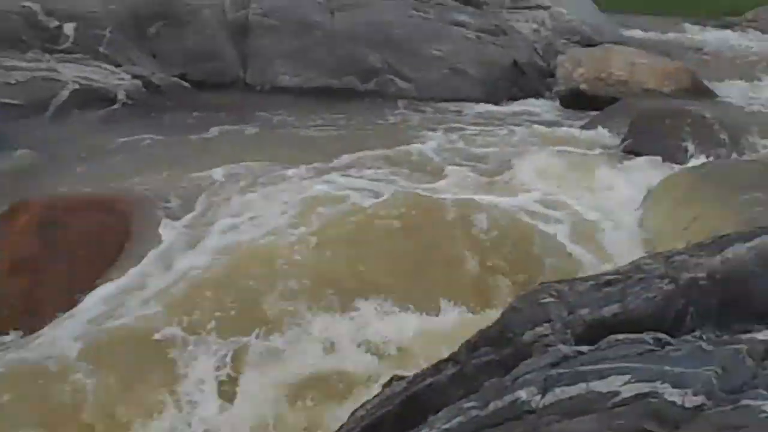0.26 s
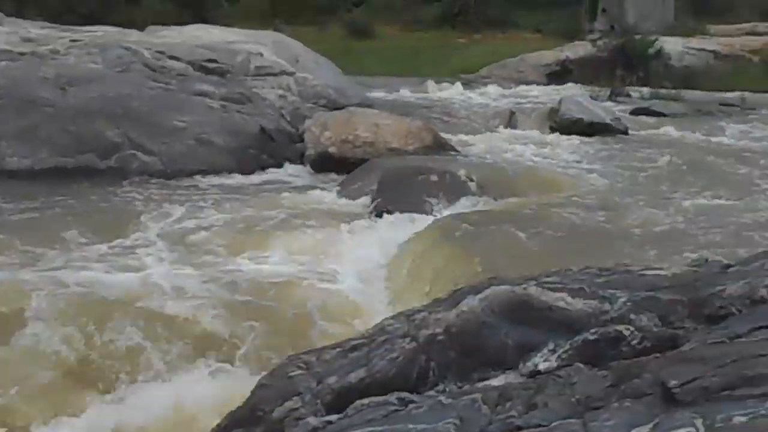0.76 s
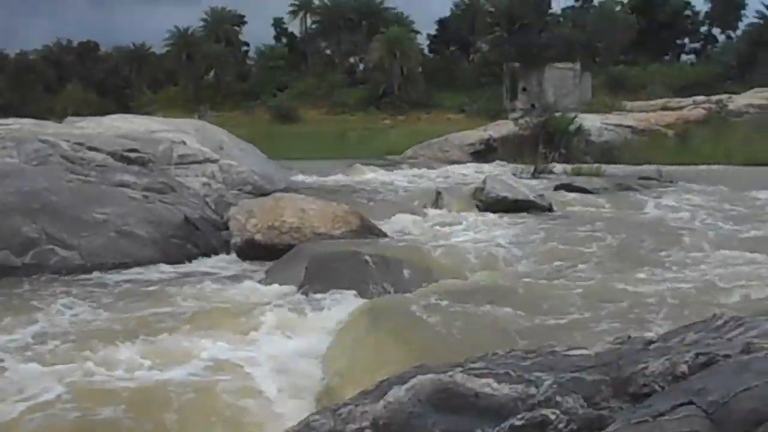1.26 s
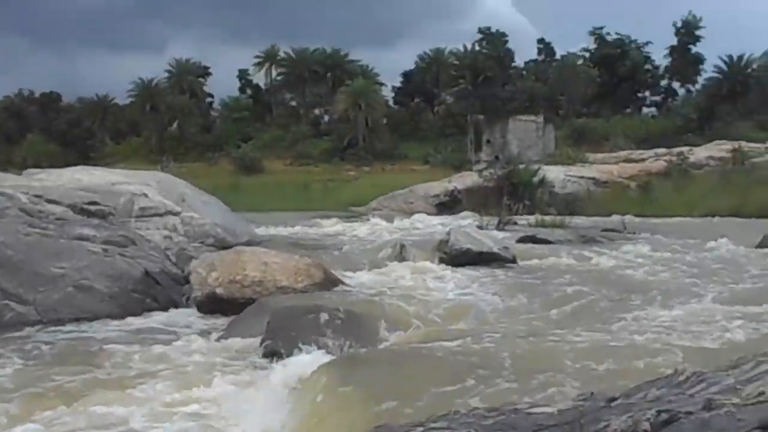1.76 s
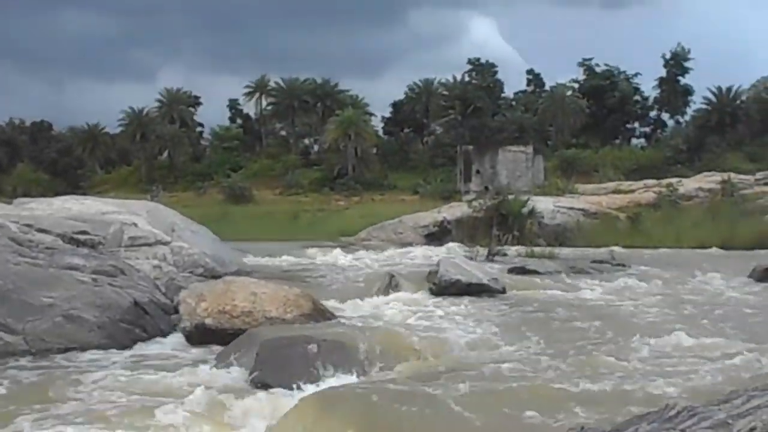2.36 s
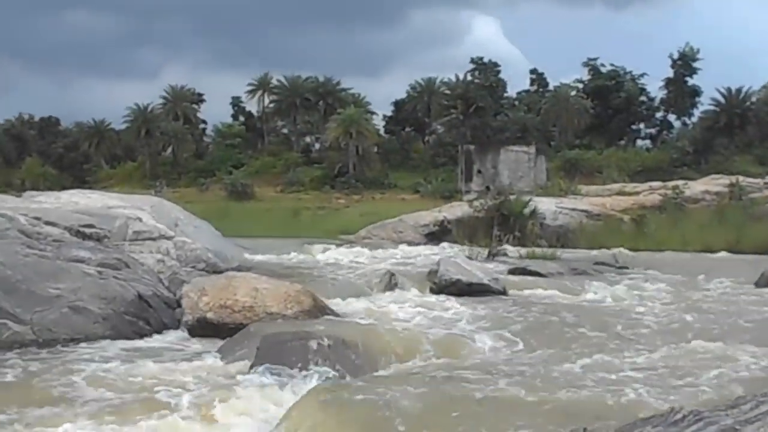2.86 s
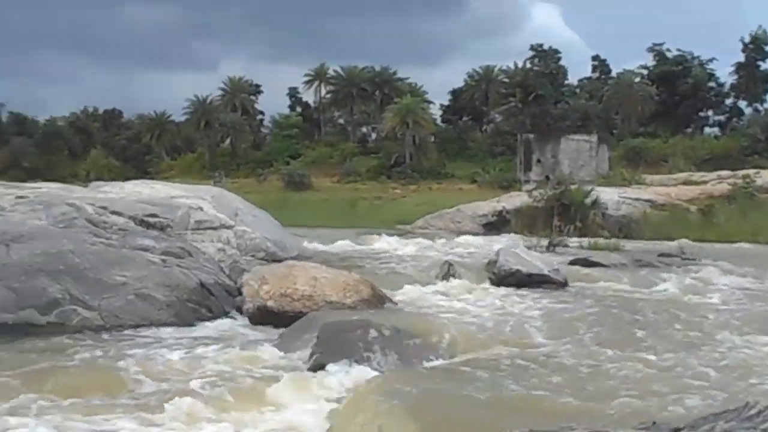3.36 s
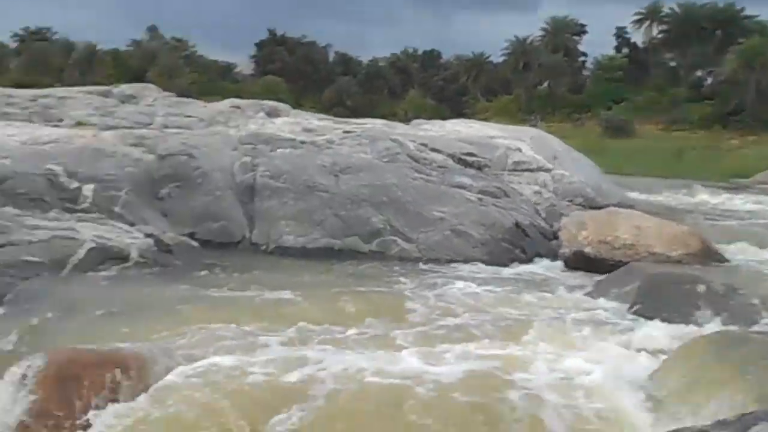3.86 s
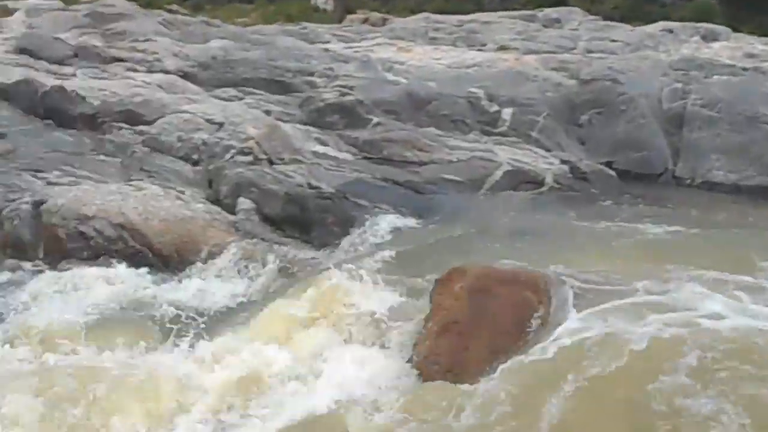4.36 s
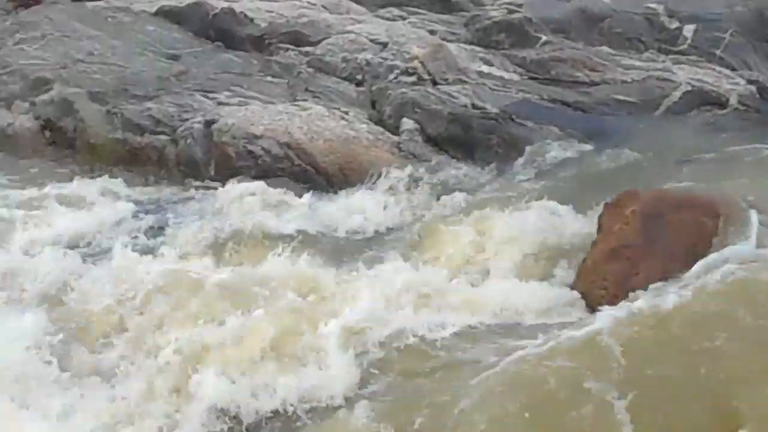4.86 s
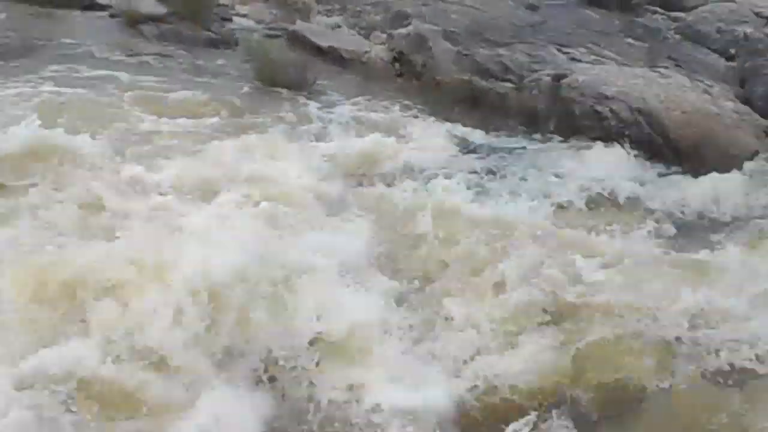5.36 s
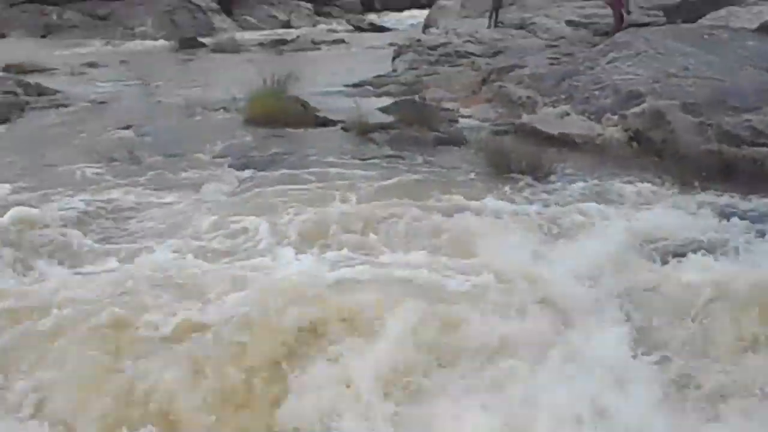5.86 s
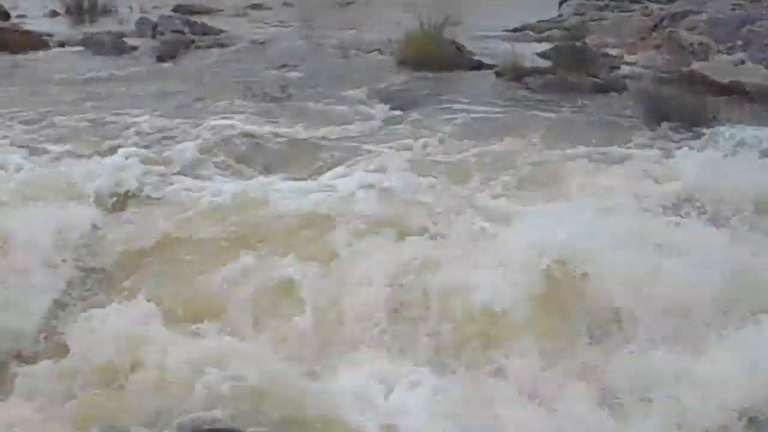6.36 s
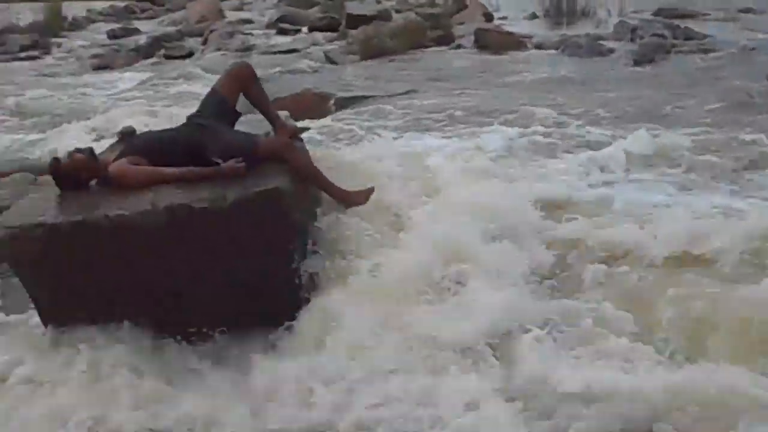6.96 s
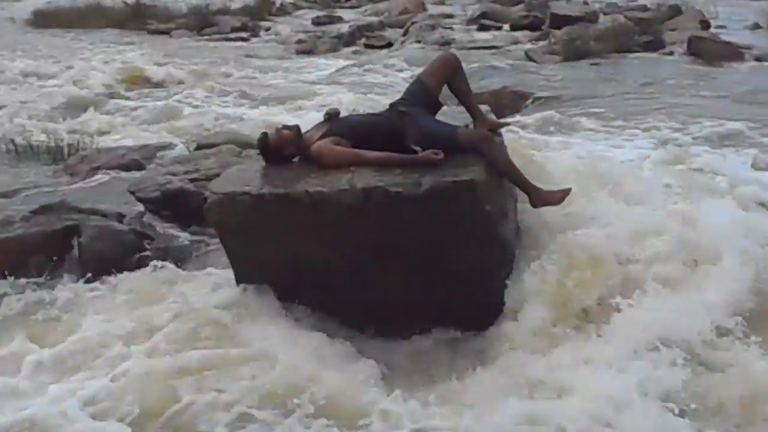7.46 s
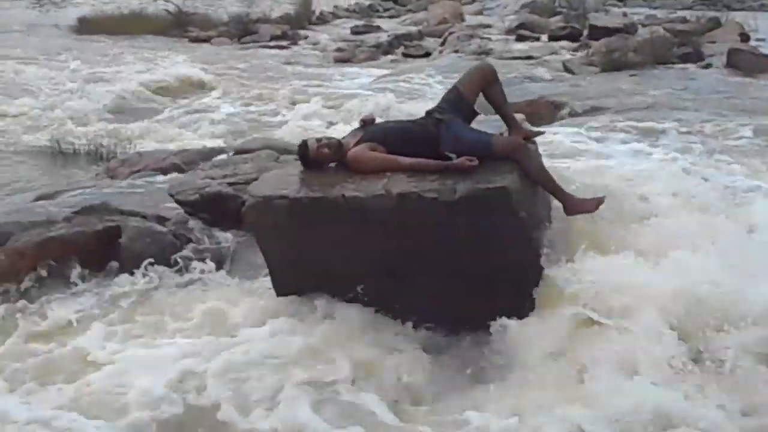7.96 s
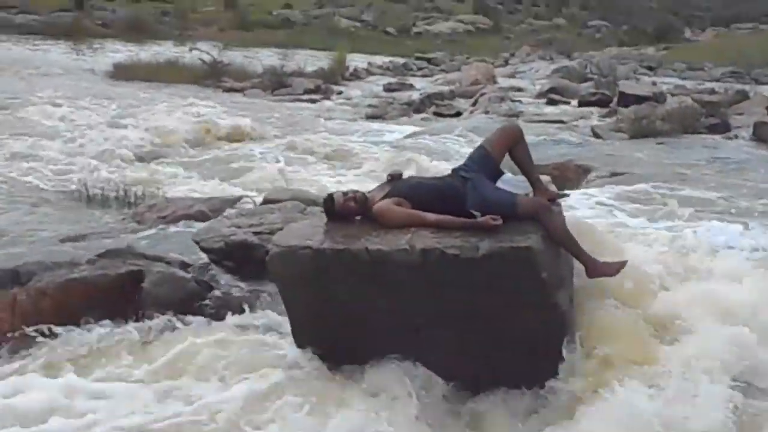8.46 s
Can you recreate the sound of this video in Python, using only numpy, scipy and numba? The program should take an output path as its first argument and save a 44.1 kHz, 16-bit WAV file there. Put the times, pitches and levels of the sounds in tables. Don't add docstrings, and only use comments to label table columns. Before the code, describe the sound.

Steady, dense roar of rapids pouring over boulders, close and churning, thin in the bass, with faint bubbly gulps and gentle surges throughout.

```python
import sys
import numpy as np
from scipy import signal
from scipy.fft import rfft, irfft, next_fast_len
from scipy.io import wavfile
from scipy.ndimage import uniform_filter1d
from numba import njit

SR = 44100
rng = np.random.default_rng(int(sys.argv[2]) if len(sys.argv) > 2 else 0)


def materialize(psi):
    bounded = np.clip(np.atleast_2d(psi).T, -1, 1)
    quanta = np.round(bounded * 32767).astype(np.int16)
    wavfile.write(sys.argv[1], SR, quanta)


def level_to_linear(level):
    exponent = np.asarray(level, float) / 20
    return 10 ** exponent


N = 384111
CAMERA_SR, FRAME = 48000, 1024
WATER_DB = -18


def on_log(hz, table):
    at, value = np.transpose(table)
    return np.interp(np.log(hz), np.log(at), value)


def unit(x):
    return x / np.sqrt(np.mean(x ** 2))


def walk(rate):
    hold = int(SR / rate)
    steps = np.repeat(rng.standard_normal(N // hold + 1), hold)
    slewed = uniform_filter1d(uniform_filter1d(steps, hold), hold)
    return unit(slewed[:N])


# start in seconds, first pitch in Hz, last pitch in Hz, length in seconds, level in dB.
AIR_POCKETS = [
    (1.63, 956, 1004, 0.084, -28),
    (2.1, 1150, 1105, 0.082, -27.5),
    (2.18, 662, 650, 0.05, -27),
    (3.13, 878, 920, .07, -31),
    (4.13, 1650, 1640, .07, -33),
    (4.75, 1434, 1470, .06, -29),
    (5.69, 920, 757, .06, -33),
    (5.8, 755, 635, 0.19, -32),
    (8.5, 458, 490, 0.15, -39),
]


def gulps():
    out = np.zeros(N)
    waver = level_to_linear(2.9 * walk(40))
    for s, from_hz, to_hz, length, db in AIR_POCKETS:
        start = int(s * SR)
        n = min(int(length * SR), N - start)
        phase = 2 * np.pi * np.cumsum(np.linspace(from_hz, to_hz, n)) / SR
        out[start:start + n] += 2 * level_to_linear(db) * np.hanning(n) * np.sin(phase)
    return out * waver


@njit
def ring(start, hz, cycles, size, glide):
    out = np.zeros(N)
    for k in range(len(start)):
        span = cycles[k] * SR / hz[k]
        z = size[k] + 0j
        turn = np.exp(2j * np.pi * hz[k] / SR - 3 / span)
        bend = np.exp(2j * np.pi * hz[k] / SR * glide / span)
        for i in range(start[k], min(N, start[k] + int(2 * span))):
            z *= turn
            turn *= bend
            out[i] += z.imag
    return out


def bubbles(per_s=9000, scatter_db=1.1, cycles=14., glide=.12):
    when, pitch, strength, life = rng.random((int(per_s * N / SR), 4)).T
    hz = 200 + 10500 * pitch ** 2
    size = hz ** .75 * level_to_linear(-scatter_db * np.log(1 - strength))
    return unit(ring((when * N).astype(np.int64), hz, cycles * (.5 + life), size, glide))


# frequency in Hz, level in dB per Hz.
MIC_COLOUR = [(40, -53.5), (90, -34), (140, -24.5), (250, -15.5), (520, -5.5), (690, -0.4), (1150, 0.5),
              (1750, -2), (3500, -2.5), (4050, -5.5), (6500, -11), (8800, -17), (10150, -26), (10750, -47)]
PART_CENTRE_HZ = (330, 1000, 1900, 3400, 7700)
# time in seconds, gain of the main chute in dB, gain of the near white water in dB.
CAMERA_TURN = [(0, -2, 0.5), (.3, 0, 0.5), (1, 0, -1.5), (1.6, 1.5, -1.2), (2.4, 1.2, -1), (3, 2, -1.2),
               (3.6, 0.4, -1), (4.2, .8, 1.5), (4.8, -.2, 2.1), (5.3, 0, 2.3), (5.9, -0.8, 1),
               (6.3, -2.5, -0.8), (6.75, -1.6, 1.5), (7.05, -3, -.3), (7.7, -2.5, 0.7), (8, -.9, 1),
               (8.3, -2.5, 1.5), (8.71, -1.2, 1.3)]
FOLLOWS_CHUTE = (.15, 1, 0.21, 0.91, .05)
FOLLOWS_FOAM = (0.079, 0.015, .15, -0.31, 1)


def rapids(bubble_share=.3, surge_db=.5, patch_db=0.22, flicker_db=0.24):
    s, chute_db, foam_db = np.transpose(CAMERA_TURN)
    part_db = np.outer(FOLLOWS_CHUTE, chute_db) + np.outer(FOLLOWS_FOAM, foam_db)
    size = next_fast_len(N)
    water = np.sqrt(bubble_share) * bubbles() + np.sqrt(1 - bubble_share) * rng.standard_normal(N)
    hz = np.maximum(np.fft.rfftfreq(size, 1 / SR), 1)
    spectrum = rfft(water, size) * level_to_linear(on_log(hz, MIC_COLOUR))
    surge = walk(9)
    patches = [walk(12) for _ in range(11)]
    out, t = 0, np.arange(N) / SR
    for k in range(29):
        centre = 20 * 2 ** (k / 3)
        third_octave = np.cos(np.pi / 2 * np.clip(3 * np.log2(hz / centre), -1, 1)) ** 2
        turn_db = [on_log(centre, list(zip(PART_CENTRE_HZ, row))) for row in np.transpose(part_db)]
        octave, between = k // 3, k % 3 / 3
        patch = (1 - between) * patches[octave] + between * patches[octave + 1]
        db = np.interp(t, s, turn_db) + surge_db * surge + patch_db * patch + flicker_db * walk(16)
        out = out + irfft(spectrum * third_octave, size)[:N] * level_to_linear(db)
    return unit(out) * level_to_linear(WATER_DB)


def scene():
    return np.tile(rapids() + gulps(), (2, 1))


def lapped(window, count):
    n, k = np.arange(2 * FRAME), np.arange(count)
    waves = np.cos(np.pi / FRAME * np.outer(n + .5 + FRAME / 2, k + .5))
    return waves * window[:, None] * np.sqrt(2 / FRAME)


def frame_at(s, rate, grid):
    first = grid + FRAME * (round((s * rate - grid) / FRAME) - 1)
    return slice(first, first + 2 * FRAME)


# centre of the first in seconds, windows in a row.
THINNED_HARD = [(.121, 2), (1.571, 2), (2.147, 2), (3.15, 1), (3.897, 1), (5.134, 1), (6.435, 1),
                (6.585, 1), (6.905, 1), (7.822, 2), (8.163, 1), (8.291, 1), (8.654, 1)]
THINNED_MILD = [.227, .441, .483, .547, .739, 1.038, 1.145, 2.467, 2.787, 4.131, 4.281, 4.729, 5.817, 6.009,
                6.051, 6.094, 6.158, 6.307, 6.969, 7.161, 7.523, 7.651, 8.611]
ZONE_BORDER_HZ = (660, 3900, 5900, 7700)
ZONE_STEP_DB = (8.3, 7, 9.8, 11.2, 12.65)
ZONE_HARD_DB = (3.2, .6, 2.2, 1.4, 1.1)


def starve(x, faintest_db=-30, leak_db=-25):
    x = signal.resample_poly(x, 160, 147)
    basis = lapped(signal.windows.cosine(2 * FRAME), count=480)
    hz = (np.arange(480) + .5) * CAMERA_SR / (2 * FRAME)
    colour, zone = level_to_linear(on_log(hz, MIC_COLOUR)), np.searchsorted(ZONE_BORDER_HZ, hz)
    out = x.copy()
    hard = [s + k * FRAME / CAMERA_SR for s, count in THINNED_HARD for k in range(count)]
    instants = [(s, np.add(ZONE_STEP_DB, ZONE_HARD_DB)) for s in hard]
    instants += [(s, ZONE_STEP_DB) for s in THINNED_MILD]
    for s, step_db in instants:
        where = frame_at(s, CAMERA_SR, grid=678)
        lines = x[where] @ basis
        local = colour * np.sqrt(uniform_filter1d((lines / colour) ** 2, size=61))
        step = np.maximum(local, level_to_linear(faintest_db)) * level_to_linear(np.array(step_db)[zone])
        kept = np.sign(lines) * step * np.floor((abs(lines) / step) ** .75 + .4054) ** (4 / 3)
        out[where] += (1 - level_to_linear(leak_db)) * basis @ (kept - lines)
    return signal.resample_poly(out, 147, 160)[:N]


# centre in seconds, low edge in Hz, high edge in
# Hz.
SPLIT_BANDS = [(.843, 5170, 6290), (1.215, 5680, 7560), (1.772, 4280, 5680), (1.795, 4650, 5680),
               (1.795, 6890, 8270), (1.981, 4240, 7540), (3.374, 4220, 5200), (3.374, 8980, 10340),
               (3.537, 4650, 6290), (3.723, 4650, 6290), (4.326, 5150, 6290), (4.535, 6290, 7580),
               (5.464, 5170, 6290), (6.486, 8960, 10340), (6.509, 5680, 6890), (7.043, 5190, 6290),
               (7.624, 4650, 5680), (7.624, 6890, 8960), (7.693, 8960, 10310), (7.949, 6890, 8960),
               (7.972, 5680, 7580), (8.065, 5680, 6890), (8.065, 7600, 9650)]


def split(x, fill_db=-0.8):
    window = signal.windows.kaiser_bessel_derived(2 * FRAME, 4 * np.pi)
    basis, out = lapped(window, count=500), x.copy()
    hz = (np.arange(500) + .5) * SR / (2 * FRAME)
    noise = rng.standard_normal((len(SPLIT_BANDS), 2, 500))
    for (s, low_hz, high_hz), draw in zip(SPLIT_BANDS, noise):
        where = frame_at(s, SR, grid=325)
        band = (hz > low_hz) & (hz < high_hz)
        lines = x[:, where] @ basis
        fill = level_to_linear(fill_db) * np.sqrt(np.mean(lines[:, band] ** 2)) * draw
        out[:, where] += (band * (fill - lines)) @ basis.T
    return out


def top_cut(x):
    return signal.sosfilt(signal.butter(12, 10760, fs=SR, output="sos"), x)


def record(dry):
    cut = signal.ellip(8, .2, 40, 10850, fs=SR, output="sos")
    mono = signal.sosfiltfilt(cut, starve(dry[0]))
    mix = split(np.tile(mono, (2, 1)))
    return top_cut(mix)


dry = scene()
out = record(dry)
materialize(out)
```